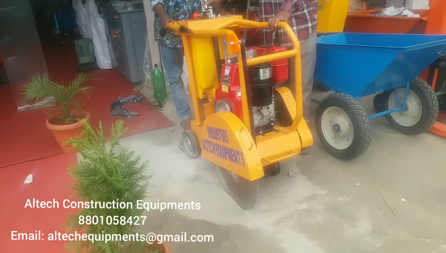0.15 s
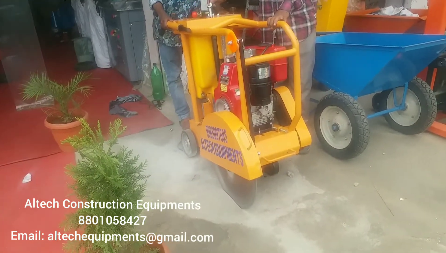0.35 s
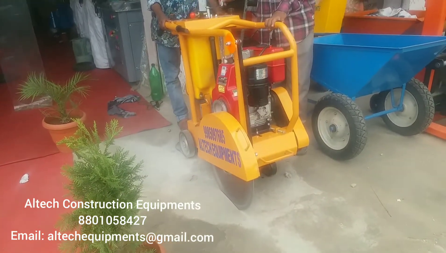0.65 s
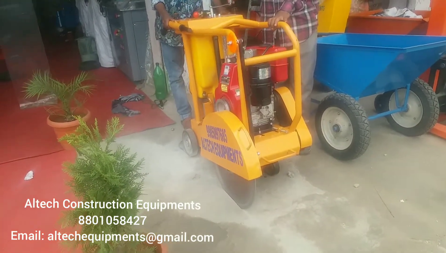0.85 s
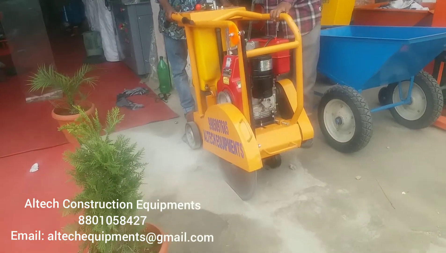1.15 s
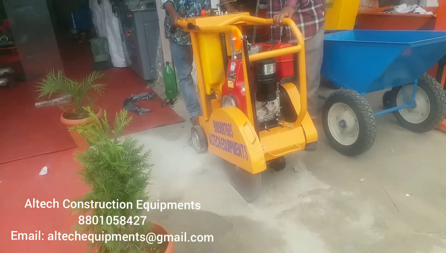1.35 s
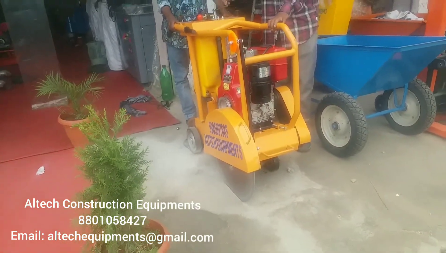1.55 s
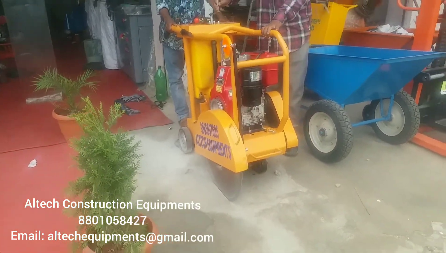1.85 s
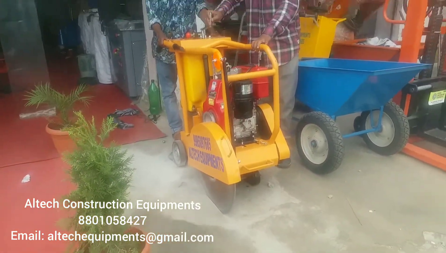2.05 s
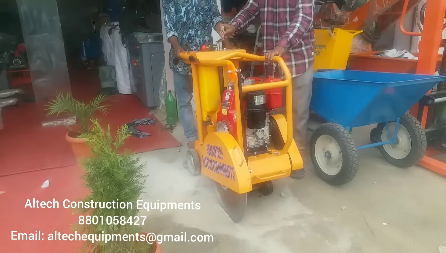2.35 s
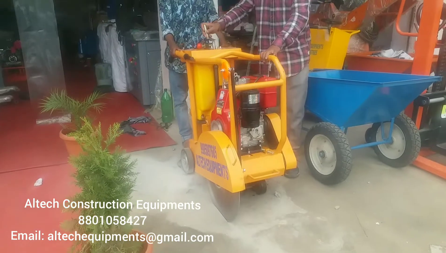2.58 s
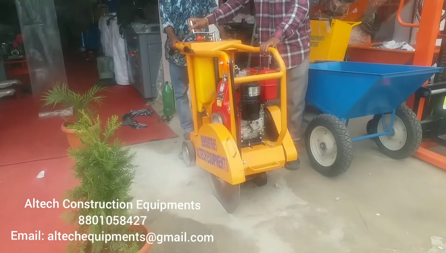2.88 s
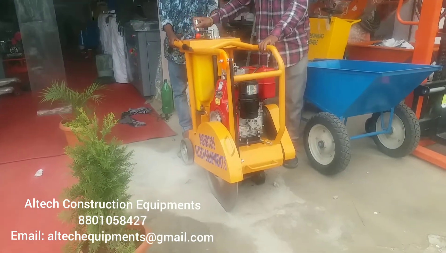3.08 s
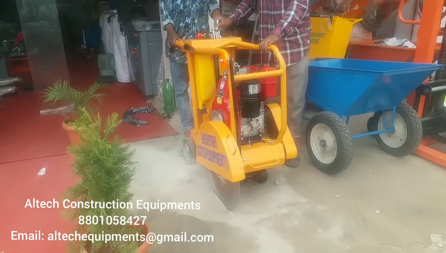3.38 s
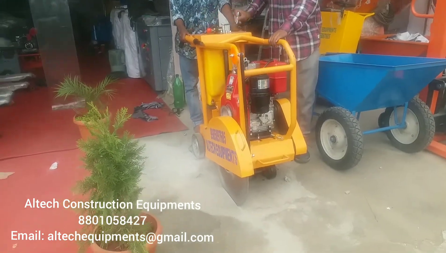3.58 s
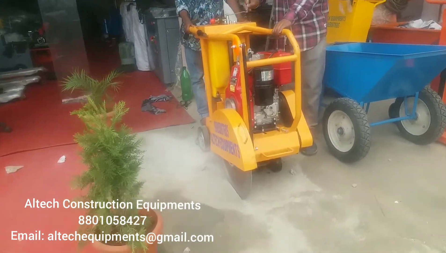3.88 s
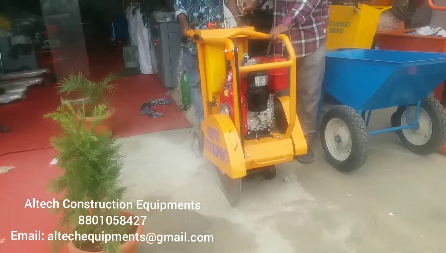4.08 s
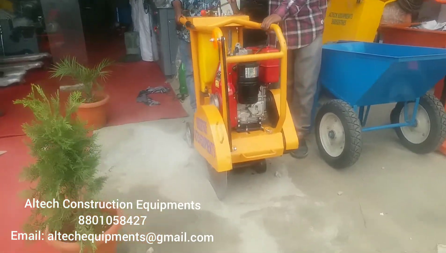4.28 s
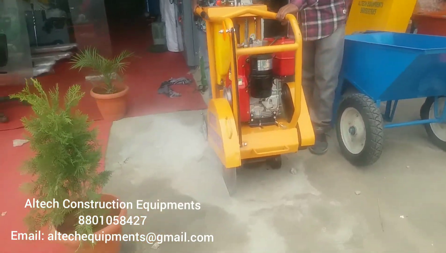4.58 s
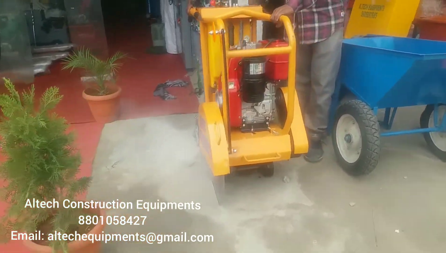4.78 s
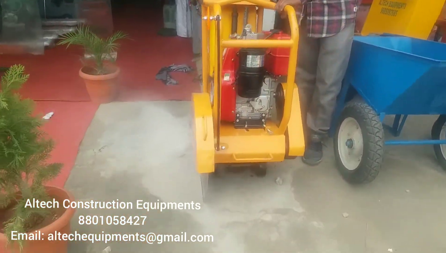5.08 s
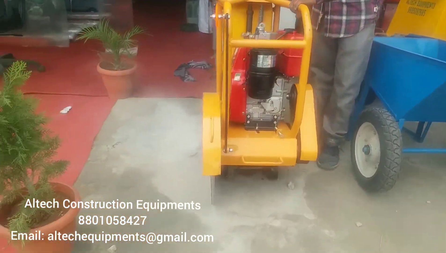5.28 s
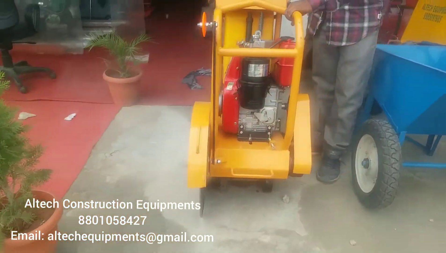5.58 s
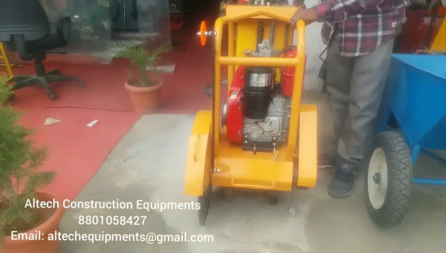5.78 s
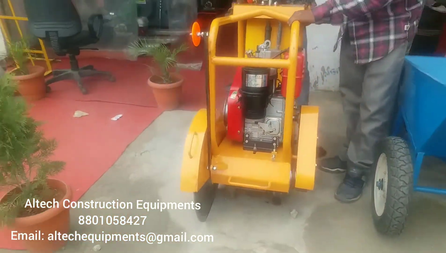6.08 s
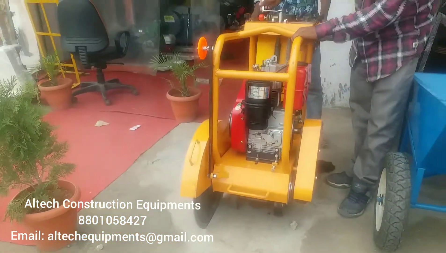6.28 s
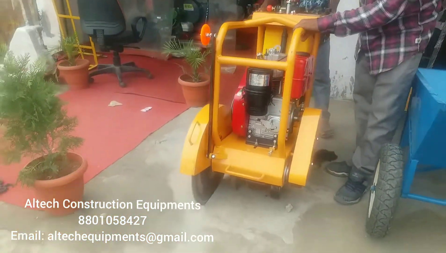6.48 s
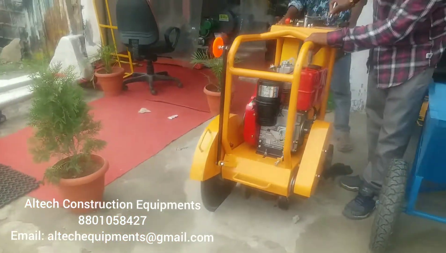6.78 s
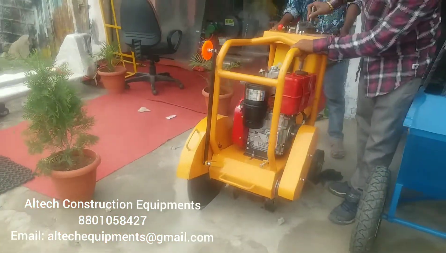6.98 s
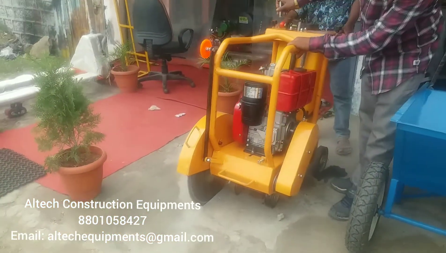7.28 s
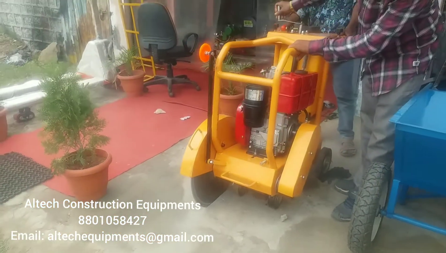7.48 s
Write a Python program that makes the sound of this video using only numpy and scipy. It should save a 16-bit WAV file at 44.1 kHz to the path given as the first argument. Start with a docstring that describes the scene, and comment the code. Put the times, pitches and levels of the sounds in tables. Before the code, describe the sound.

A walk-behind petrol saw cuts concrete close to a handheld stereo microphone in an open paved area. A piercing, slightly wavering squeal, dense steel ringing and dry grit hiss surge in uneven bites over a fast engine drone. The squeal weakens as the listener moves to the front, engine clatter comes forward, then ringing and hiss return strongly.

```python
"""A walk-behind petrol saw grinds a concrete floor; first it is heard from the blade side, where the steel
rim squeals by stick-slip, rings in many modes and throws hissing grit over a four-stroke's drone.
From about 3 s the camera walks to the front, where the frame shades the clear blade modes; the squeal
weakens and the cut eases near 5.7 s, so the gain control lifts the engine's firing orders and clatter.
Just before 6 s ring and grit return, towards the far side; engine speed sags and the squeal fades last."""
import sys
import numpy as np
from scipy import signal
from scipy.fft import rfft, irfft, next_fast_len
from scipy.io import wavfile
from scipy.ndimage import uniform_filter1d, map_coordinates

SR = 44100
rng = np.random.default_rng(int(sys.argv[2]) if len(sys.argv) > 2 else 0)


def wav_record(signal):
    """Record a signal, one row per channel, as 16-bit PCM in the file named by sys.argv[1]."""
    frames = np.transpose(np.atleast_2d(signal))
    bounded = np.clip(frames, -1, 1)
    # unit amplitude maps onto the largest positive 16-bit level
    quanta = np.round(bounded * 32767).astype(np.int16)
    wavfile.write(sys.argv[1], SR, quanta)


N = 336924

# Direction of the camera from the saw [t/s, bearing: 0 blade side, 1 front, 2 far side]
BEARING = [(0, 0), (2.8, .1), (3.8, .45), (4.6, .75), (5.75, 1), (6.05, 1.7), (7.64, 2)]
# Engine speed [t/s, firing rate/Hz]
FIRING_RATE = [(0, 19.42), (.8, 19.35), (1.7, 19.12), (2.6, 19.23), (3.6, 18.93), (4.0, 18.71),
               (4.55, 18.33), (5.9, 18.57), (6.8, 18.27), (7.64, 17.89)]
# Firing orders from four directions [multiple of firing rate, relative level/dB]
ORDERS_SIDE = [(1, -32), (2, -28), (3, -13), (4, 4), (5, -34), (6, -0.5), (7, 4), (8, 5.5), (9, -2.5),
               (10, -4), (11, -37), (12, -10), (13, -2.5), (14, -19), (15, -38), (16, 5), (17, -26),
               (18, -4), (19, -44), (20, -31), (21, -46), (22, -28)]
ORDERS_CORNER = [(1, -38), (2, -35), (3, -17), (4, -1), (5, -28), (6, -25), (7, -2), (8, -27), (9, -20),
                 (10, 7.5), (11, -20), (12, -25), (13, -26), (14, -4), (15, -23), (16, 1.5), (17, -4),
                 (18, -18), (19, -27), (20, -25), (21, -34), (22, -34)]
ORDERS_FRONT = [(1, -36), (2, -36), (3, -24), (4, 6), (5, -20), (6, -37), (7, 3), (8, 8), (9, -19),
                (10, 12.5), (11, -22), (12, 0), (13, -19), (14, -24), (15, -38), (16, -7), (17, 0),
                (18, -22), (19, -10), (20, -18), (21, -1), (22, -35)]
ORDERS_FAR = [(1, -36), (2, -28), (3, -28), (4, 4.5), (5, -25), (6, -22), (7, 2), (8, 9), (9, -4),
              (10, 8.5), (11, -20), (12, -11), (13, -5), (14, 2.5), (15, -25), (16, -26), (17, 0.5),
              (18, -1.5), (19, -6), (20, -21), (21, -3), (22, -9)]
# Spectrum of the exhaust noise [f/Hz, relative density/dB]
PUFF_SPECTRUM = [(18, -43), (30, -26), (59, -11.5), (162, -1.5), (219, -3.5), (316, 1), (500, -22),
                 (650, -50), (1100, -120)]
# Spectrum of valves and covers [f/Hz, relative density/dB]
CLATTER_SPECTRUM = [(240, -18), (400, -9), (483, -10.5), (680, 1), (735, -4.5), (850, -2), (1080, -7.5),
                    (1170, -4), (1700, -1), (2300, -10), (3200, 1), (4500, -46)]
# Engine covers that hum [f/Hz, mean level/dB, bearing they face]
COVER_TONES = [(832, -48, 0), (1170, -43, 2)]
# Rim digging in [t/s, length/s, level change/dB]
BITES = [(0.01, 0.14, 3), (0.294, 0.17, 3), (0.515, 0.21, 3.5), (0.794, 0.14, 1.5), (1, 0.37, 4),
         (1.416, 0.19, 2), (1.778, 0.24, 6.5), (2.125, 0.16, 7), (2.369, .11, 5), (2.62, 0.31, 4),
         (3.075, 0.16, 3), (3.26, 0.12, 3), (3.498, 0.045, -1), (4.282, .3, 1), (4.654, 0.072, 5),
         (4.8, .08, 2.5), (4.97, .06, 2), (5.05, .05, 3), (5.2, .06, 4), (5.39, .04, 2), (5.44, .04, 3),
         (5.55, .04, 2.5), (5.91, .05, 2), (6.07, .05, 2), (6.36, .12, 2)]
# Grit hiss between bites [t/s, level/dB]
GRIT_LEVEL = [(0, -26.5), (2.2, -27), (2.55, -31), (2.8, -24), (4.3, -24.5), (4.85, -25.5), (4.95, -31),
              (5.4, -31), (5.5, -33), (5.62, -32.5), (5.75, -40), (5.95, -23.5), (6.45, -20), (6.9, -24.5),
              (7.3, -21.5), (7.64, -22.5)]
# Spectrum of the grit hiss [f/Hz, relative density/dB]
GRIT_SPECTRUM = [(4000, -60), (6500, -2), (8500, 1.5), (10000, 0.5), (12000, -1), (14000, -3.5),
                 (15000, -1), (15300, -8), (16500, 1)]
# Noise around the squeal [t/s, level/dB]
RASP_LEVEL = [(0, -25), (.7, -25.5), (1.3, -30), (2.6, -27), (4.6, -32), (5.7, -32), (6.3, -28),
              (7.64, -27)]
# Spectrum of that noise [f/Hz, relative density/dB]
RASP_SPECTRUM = [(1500, -79), (1700, -12), (1850, -3), (1960, 2.5), (2080, -1.5), (2250, -6.5), (2500, -11),
                 (3000, -37)]
# Blade modes beside the squeal [t/s, length/s, f/Hz, level/dB]
LOW_MODES = [(4.41, .07, 1777, -29), (4.53, .05, 1777, -33), (4.72, .2, 1777, -30), (4.99, .1, 1777, -32),
             (5.97, .58, 2075, -35), (6.39, .08, 1777, -32), (6.97, .36, 1777, -28), (7.1, .08, 2100, -33),
             (7.32, .13, 1863, -26), (7.36, .3, 1777, -31), (7.5, .12, 1863, -32)]
# Blade ring between bites [t/s, level/dB]
RING_LEVEL = [(0, -19.5), (1.4, -19.5), (2.05, -21), (2.55, -23), (3.0, -19), (3.7, -19), (4.3, -18.5),
              (4.6, -20.5), (5.3, -27.5), (5.77, -30.5), (5.93, -22), (6.2, -15), (7.0, -13.5),
              (7.64, -14.5)]
# Stereo balance added to the ring [t/s, left-right level/dB]
RING_BALANCE = [(0, 0.3), (1.5, 0.5), (2.05, 3.5), (2.45, 0), (4.3, 3.5), (4.9, 2), (5.9, 0), (7.64, 3)]
# Clear disc modes, before their sum is sharpened
# [f/Hz, width/Hz, level from blade side/dB, level from far side/dB]
DISC_MODES = [(2369, 14, -15, -14), (2449, 14, -14, -19), (2611, 14, -19, -24), (2724, 14, -14, -9),
              (2853, 27, -17, -17), (3149, 14, -12, -15), (3198, 22, -9, -11), (3284, 14, -14, -21),
              (3445, 16, -8, -9), (3607, 24, -2, -6), (3833, 28, -3, -8), (3930, 18, -6, -8),
              (4113, 21, -8, -11), (4188, 33, -5, -7), (4393, 15, -7, -13), (4447, 14, -11, -10),
              (4597, 31, -11, -3), (4748, 24, -14, -10), (4947, 14, -12, -6), (5050, 45, -6, -7),
              (5120, 14, -8, -5), (5238, 21, -17, -10), (5308, 14, -12, -17), (5523, 14, -7, -10),
              (5669, 22, -4, -8), (5766, 15, -15, -16), (5943, 27, -14, -10), (6158, 19, -18, -15),
              (6266, 21, -15, -6), (6379, 21, -17, -8), (6573, 18, -18, -6), (6885, 34, -15, -2),
              (7090, 19, -19, -10), (7251, 14, -17, -7), (7472, 35, -11, -8), (7537, 31, -16, -10),
              (7650, 14, -18, -10), (7720, 40, -14, -10), (7962, 27, -11, -8), (8070, 17, -14, -11),
              (8215, 15, -20, -6), (8829, 31, -18, -9)]
# Spectrum of the dense weak modes [f/Hz, relative density/dB]
DENSE_MODES = [(2000, -60), (2400, -30), (3000, -25), (3500, -21), (4300, -20), (4800, -22), (5400, -19),
               (6800, -19), (8000, -18), (8500, -26), (10000, -32), (12000, -90)]
# Squeal between breaks [t/s, level/dB, left-right level/dB]
SQUEAL_LEVEL = [(0, -20, -6.5), (.45, -20.5, -5.5), (1.0, -18.5, -6), (1.35, -17, -3.5), (1.75, -16, -2.5),
                (2.15, -18, -0.5), (2.6, -17, 0), (4.1, -19, -3), (4.45, -25, -8), (4.95, -29, 10),
                (5.45, -30.5, 1), (5.95, -24.5, -14.5), (6.4, -24, -3.5), (6.75, -20.5, -10),
                (6.93, -23, -4), (7.0, -32, -3), (7.2, -37, -3), (7.64, -45, -7)]
# Squeal losing grip [t/s, length/s, loss/dB]
GRIP_BREAKS = [(.53, .05, 5.5), (1.9, 0.043, 7), (2.216, 0.045, 4.5), (3.054, 0.049, 2), (4.72, .16, 9),
               (4.988, 0.31, 5.5), (5.57, 0.295, 10.5), (6.385, 0.037, 14)]
# Microphone ports: correlation, balance and phase between the channels
LIKENESS = [(60, 0.93), (100, 0.92), (180, 0.95), (310, 0.9), (550, 0.77), (950, 0.8), (1650, 0.84),
            (2860, 0.41), (4970, 0.2), (8640, 0.41), (15000, 0.32)]  # [f/Hz, left-right likeness]
PORT_BALANCE = [(60, 7), (99, 9.5), (160, 4), (270, 1.5), (450, 3.0), (740, 1.5), (1220, 0), (2010, -3),
                (3330, -0.5), (5500, 9), (9080, -0.5), (15000, 6)]  # [f/Hz, left-right level/dB]
PORT_LEAD = [(0, 0), (1460, -0.6), (1810, 0.1), (2580, 0.3), (3010, 0.6), (3450, 1.0), (3960, 1.1),
             (5080, 1.2), (5680, 0.5), (6200, 0.9), (6550, -0.5), (7060, -0.0), (7840, 0.0), (16000, -0.0)]  # [f/Hz, left lead/rad]

EXHAUST_BASE_DB, CLATTER_BASE_DB = -32, -32.5
ENGINE_FAR_DB, CLATTER_FAR_DB, CLATTER_FRONT_DB = 1.8, 0.5, 1  # gains by direction
SQUEAL_HZ, REFERENCE_RATE_HZ = 1955, 19  # squeal pitch at this firing rate
SQUEAL_HZ_PER_FIRING = 43  # change of pitch per Hz of firing rate
GRIT_SHARE = 0.54  # part of each bite's level change that the hiss follows
RISE_S, FALL_S = .015, .035  # edges of a bite, a break or a waking mode
TARGET_DB, GAP_SHARE, MAX_BOOST_DB, AVERAGING_S = -11, 0.53, 6.5, 0.026  # gain control
TOP_HZ = 15740  # band limit


def amp(db):
    """The decibel: an amplitude ratio of 10 to the power dB/20."""
    return np.exp(np.asarray(db) * (np.log(10) / 20))


def unit(x):
    """Normalisation to unit root-mean-square."""
    return x / np.sqrt(np.mean(x ** 2) + 1e-20)


def running_rms(x, span):
    """Short-term root-mean-square over span samples."""
    return np.sqrt(np.abs(uniform_filter1d(x ** 2, span)))


def along(points, hz):
    """Linear interpolation of a spectrum on a logarithmic frequency axis."""
    f, v = np.transpose(points)
    return np.interp(np.log(hz + 1), np.log(f + 1), v)


def curves(rows):
    """Linear interpolation in time: one signal for each column after t."""
    t, *columns = np.transpose(rows)
    return [np.interp(np.arange(N) / SR, t, c) for c in columns]


def wobble(rate):
    """Band-limited random drift: a smooth curve through rate random knots a second."""
    step = max(8, int(SR / rate / 24))
    coarse = np.arange(0, N + step, step)
    knots = rng.standard_normal(int(N * rate / SR) + 4)
    return np.interp(np.arange(N), coarse, map_coordinates(knots, [coarse * rate / SR]))


def window(start, length):
    """Gating: rises to 1 at start, holds, and falls more slowly around start + length."""
    corners = (-RISE_S, 0, length - FALL_S / 2, length + FALL_S / 2)
    return np.interp(np.arange(N) / SR - start, corners, (0, 1, 1, 0))


def filtered(x, response):
    """Linear filtering: the spectrum of x times a response of frequency."""
    m = next_fast_len(N + SR // 10, real=True)
    return irfft(rfft(x, m) * response(np.fft.rfftfreq(m, 1 / SR)), m)[..., :N]


def patchy(depth_db, size):
    """Modulated noise: two noises share gains drifting in patches of size (frequency bins, frames)."""
    z = signal.stft(rng.standard_normal((2, N)), nperseg=2048)[2]
    field = rng.standard_normal(z.shape[1:])
    field = uniform_filter1d(uniform_filter1d(field, size[0], 0), size[1], 1)
    return signal.istft(z * amp(depth_db * unit(field)), nperseg=2048)[1][:, :N]


def repeating(turns, renew):
    """Cyclic excitation: two noises recur every engine cycle, taking a new shape renew times a second."""
    shapes = rng.standard_normal((2, int(N * renew / SR) + 2, 256))
    where = [np.arange(N) * renew / SR, turns % 1 * 256]
    return np.array([map_coordinates(s, where, order=1, mode="grid-wrap") for s in shapes])


def ports(pair, closer=0.0):
    """Partial coherence: mid and side from two noises set the likeness of left and right."""
    def mixing(hz):
        turn = np.arccos(np.clip(along(LIKENESS, hz) + closer, 0, 1)) / 2
        return np.cos(turn - np.array([[0], [np.pi / 2]]))

    def balance(hz):
        left = amp(along(PORT_BALANCE, hz) / 2) * np.exp(.5j * along(PORT_LEAD, hz))
        return left ** np.array([[1], [-1]])

    mid, side = filtered(pair, mixing)
    return filtered(np.array([mid + side, mid - side]), balance)


def panned(x, balance_db):
    """Intensity stereophony: half the level difference goes to each channel."""
    return x * amp(np.array([balance_db, -balance_db]) / 2)


def cover_hum():
    """Directional radiation: engine covers hum as fuzzy tones, each heard from the side it faces."""
    bearing, = curves(BEARING)
    t = np.arange(N) / SR
    hum = np.zeros(N)
    for hz, db, towards in COVER_TONES:
        facing = np.clip(1.2 - 4 * np.abs(bearing - towards), 0, 1)
        tone = np.sqrt(2) * np.sin(2 * np.pi * hz * t + 1.7 * wobble(20))
        hum += amp(db + 2.3 * wobble(8)) * facing * tone
    return hum


def firing_orders(cycle, bearing):
    """Fourier series of the exhaust pulses: unsteady harmonics of the firing rate."""
    drone = np.zeros(N)
    for (k, side), (_, corner), (_, front), (_, far) in zip(
            ORDERS_SIDE, ORDERS_CORNER, ORDERS_FRONT, ORDERS_FAR):
        size = np.interp(bearing, (.05, .45, .9, 1.8), amp([side, corner, front, far]))
        size = size * amp(1.3 * wobble(3))
        # phase growing as k squared: the pipe spreads each pulse in time
        drone += size * np.sin(k * cycle + .12 * k * k + .15 * wobble(4))
    return drone / running_rms(drone, SR // 2)


def engine():
    """Periodic excitation: a four-stroke's firing orders, with puffs and clatter gated by the crank."""
    bearing, = curves(BEARING)
    rate, = curves(FIRING_RATE)
    far = np.clip(bearing - 1, 0, 1)
    front = np.clip(1 - np.abs(bearing - 1) * 2, 0, 1)
    change_db = ENGINE_FAR_DB * far + .5 * wobble(7)
    exhaust_db = EXHAUST_BASE_DB + change_db
    clatter_db = CLATTER_BASE_DB + change_db + CLATTER_FRONT_DB * front + CLATTER_FAR_DB * far
    clatter_db = clatter_db + 0.92 * wobble(12)
    turns = np.cumsum(rate) / SR  # engine cycles, one firing each
    cycle = 2 * np.pi * turns
    drone = firing_orders(cycle, bearing)
    gate = amp(1.4 * np.cos(2 * cycle) + 2.05 * np.cos(cycle))  # two turns per firing, one the louder
    puff = filtered(gate * rng.standard_normal((2, N)), lambda hz: amp(along(PUFF_SPECTRUM, hz)))
    # valve gear repeats, loose covers do not
    knocks = amp(-8) * unit(repeating(turns, renew=1.5)) + patchy(2.5, size=(24, 2))
    clatter = filtered(gate ** 0.72 * knocks, lambda hz: amp(along(CLATTER_SPECTRUM, hz)))
    tones = amp(exhaust_db - 3.1) * drone * amp([[1.7], [-1.7]])
    return tones + ports(amp(exhaust_db - 7) * unit(puff) + amp(clatter_db) * unit(clatter))


def bites():
    """Contact loading: level change in dB while the rim digs in."""
    return sum(db * window(start, length) for start, length, db in BITES)


def grit(bite_db):
    """Random impact noise: stone dust sprays in fast bursts, duller away from the blade side."""
    bearing, = curves(BEARING)
    grit_db, = curves(GRIT_LEVEL)
    bursts = amp(1.5 * wobble(55) + .8 * wobble(600))
    spray = bursts * patchy(0.98, size=(40, 2))
    hiss = ports(filtered(spray, lambda hz: amp(along(GRIT_SPECTRUM, hz))), closer=0.075)
    top = filtered(hiss, lambda hz: np.clip((hz - 9500) / 3500, 0, 1))
    top_gain = amp(-6 * np.clip(1.6 * bearing - .9, 0, 1))
    hiss = hiss - (1 - top_gain) * top
    hiss /= running_rms(hiss.mean(0), SR)
    return amp(grit_db + GRIT_SHARE * bite_db + 1.4 * wobble(4.5)) * hiss


def rasp():
    """Radiation efficiency: a hump of noise around the squeal, where the disc radiates best."""
    db, = curves(RASP_LEVEL)
    hump = ports(filtered(patchy(0.85, size=(4, 4)), lambda hz: amp(along(RASP_SPECTRUM, hz))))
    return amp(db + 1.8 * wobble(6.8)) * hump / np.std(hump.mean(0))


def low_rings():
    """Modal excitation: blade modes of fixed pitch near the squeal wake as fuzzy tones."""
    t, blur = np.arange(N) / SR, wobble(25)
    tones = sum(amp(db) * window(start, length) * np.sin(2 * np.pi * hz * t + blur)
                for start, length, hz, db in LOW_MODES)
    return np.sqrt(2) * amp(2.4 * wobble(25)) * tones * amp([[.3], [-.3]])


def disc_response(f, column):
    """Modal superposition: resonances of alternating sign, with levels from one column."""
    total = 0
    for k, mode in enumerate(DISC_MODES):
        centre, width = mode[:2]
        damping = 1j * f * width
        total = total + (-1) ** k * amp(mode[column]) * damping / (centre ** 2 - f * f + damping)
    return np.abs(total) ** 1.15  # sharpens peaks and dips


def blade_ring(bite_db):
    """Forced vibration: rough contact drives disc modes that radiate differently to each side."""
    bearing, = curves(BEARING)
    ring_db, = curves(RING_LEVEL)
    balance_db, = curves(RING_BALANCE)
    drive = patchy(3, size=(4, 5))
    near, far = [filtered(drive, lambda f: np.interp(f, f[::16], disc_response(f[::16], column)))
                 for column in (2, 3)]
    clear = (1 - bearing / 2) * near + bearing / 2 * far
    # narrow, lasting patches stand for many weak modes
    dense = filtered(patchy(3.5, size=(1, 24)), lambda hz: amp(along(DENSE_MODES, hz)))
    # the frame hides the clear modes from the front
    shade = amp(-7 * np.clip(1 - np.abs(bearing - 1) * 2.5, 0, 1))
    steel = ports(amp(1.5) * shade * clear, closer=0.45) + ports(dense)
    steel /= running_rms(steel.mean(0), SR // 8)  # so shade alters the mixture, not the level
    level = amp(ring_db + bite_db + 0.92 * wobble(9))
    return panned(level * steel, balance_db + .7 * wobble(4.6))


def squeal():
    """Stick-slip oscillation of the rim: a sine with a noisy phase and a weak octave."""
    rate, = curves(FIRING_RATE)
    hz = SQUEAL_HZ + SQUEAL_HZ_PER_FIRING * (rate - REFERENCE_RATE_HZ)  # sags with engine speed
    db, balance_db = curves(SQUEAL_LEVEL)
    loss = sum(loss_db * window(start, length) for start, length, loss_db in GRIP_BREAKS)
    db = db - loss + 0.87 * wobble(11)
    phase = 2 * np.pi * np.cumsum(hz + 3 * wobble(30) + 6 * wobble(300)) / SR
    size = np.sqrt(2) * amp(db + 0.27 * wobble(30) + 0.56 * wobble(150))
    # phase offset/rad of each channel, drifting separately
    lag = np.array([[.1], [-.1]]) + 0.039 * np.array([wobble(4.2), wobble(4.9)])
    tone = np.sin(phase + lag) + amp(-16) * np.sin(2 * phase)
    return panned(size * tone, balance_db)


def scene():
    """Linear superposition of the sources; ring and grit share the same bites."""
    bite_db = bites()
    background = cover_hum() + engine()
    return background + grit(bite_db) + rasp() + low_rings() + blade_ring(bite_db) + squeal()


def record(dry):
    """Level compression: gain follows the louder channel; peaks clip softly below a band limit."""
    span = round(AVERAGING_S * SR)
    power = np.abs(uniform_filter1d(dry ** 2, span)).max(0)
    heard_db = 10 * np.log10(power + 1e-9)
    gain_db = np.minimum(GAP_SHARE * (TARGET_DB - heard_db), MAX_BOOST_DB)
    held = dry * amp(uniform_filter1d(gain_db, span))
    clipped = held / (1 + np.abs(held) ** 8) ** (1 / 8)
    return .98 * filtered(clipped, lambda hz: hz < TOP_HZ)


dry = scene()
out = record(dry)
wav_record(out)
```